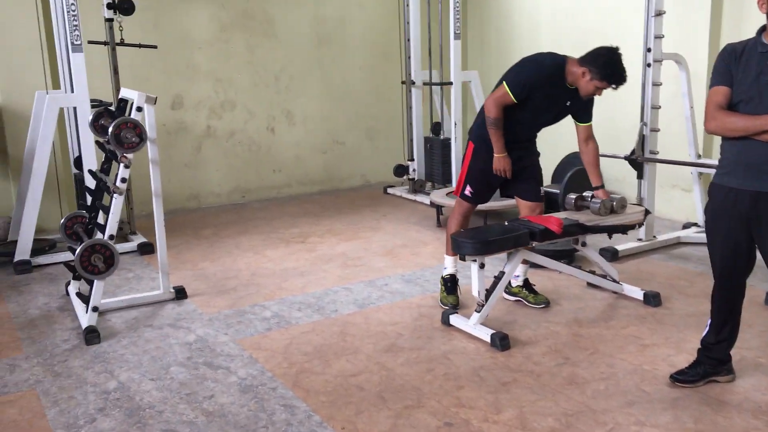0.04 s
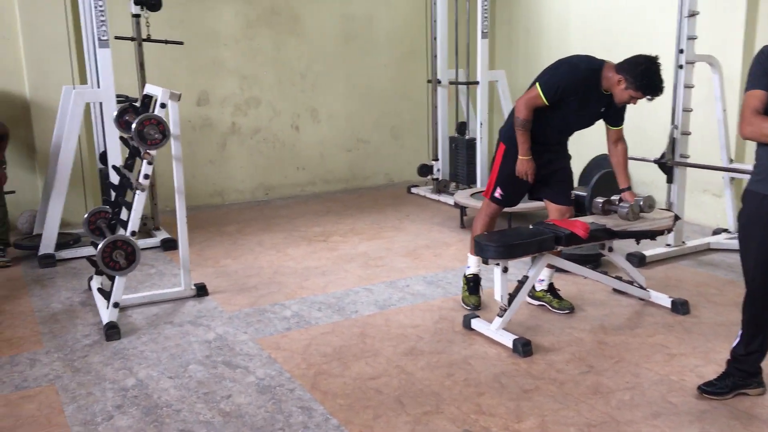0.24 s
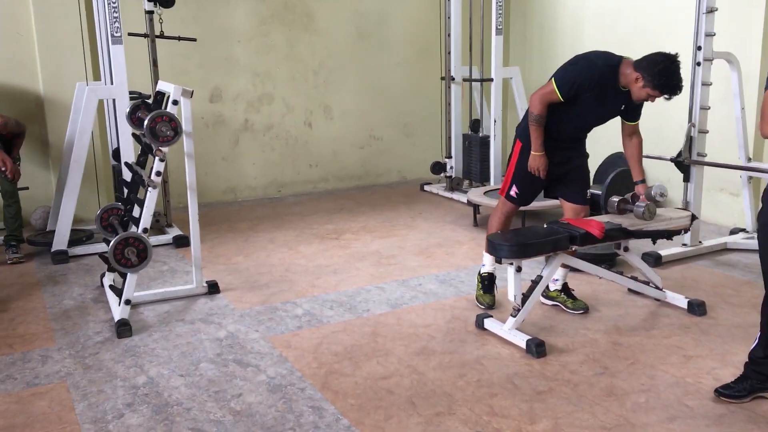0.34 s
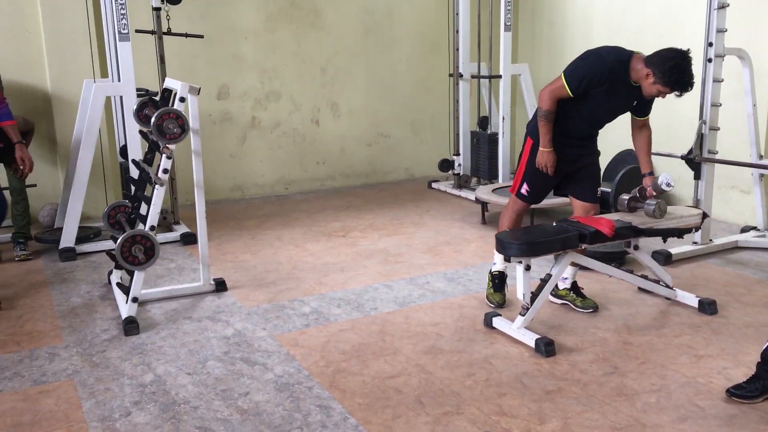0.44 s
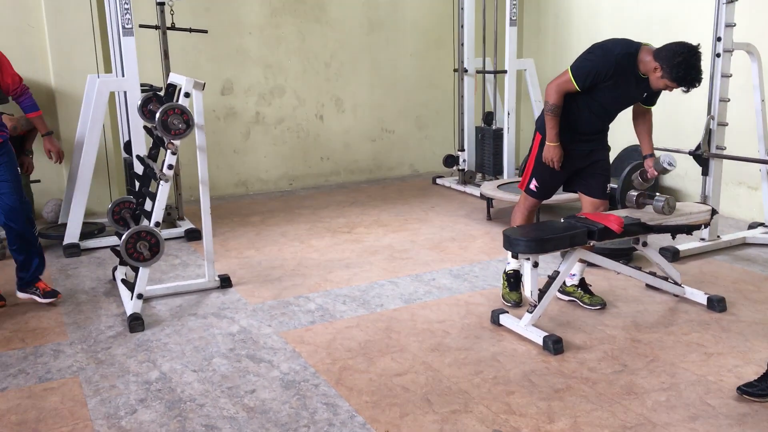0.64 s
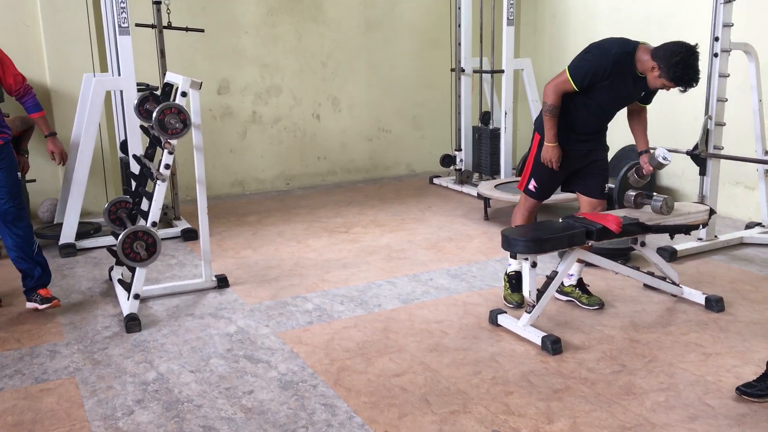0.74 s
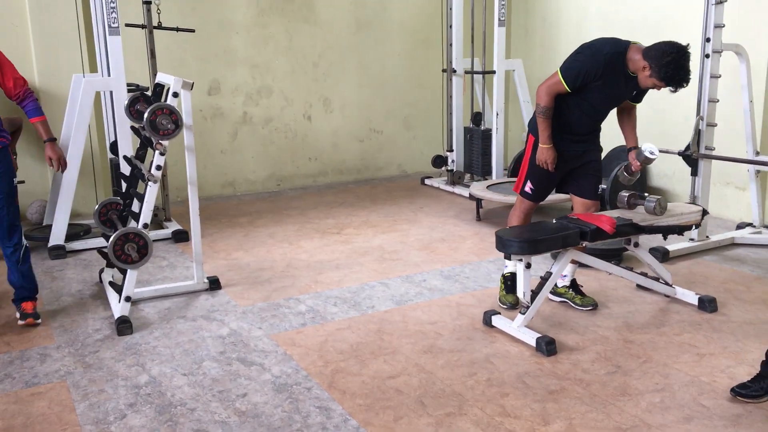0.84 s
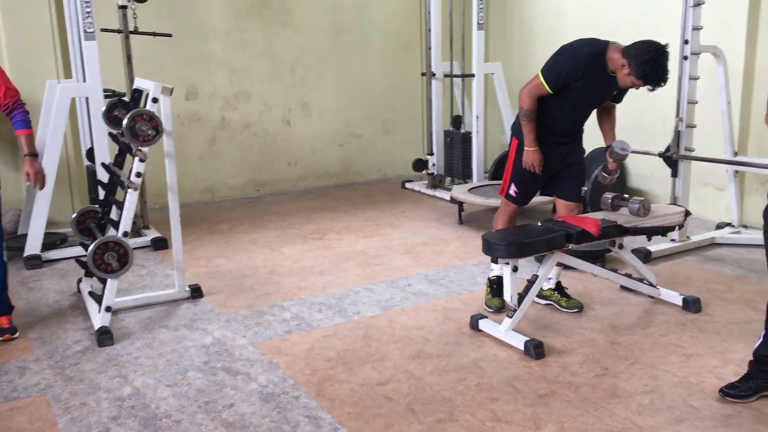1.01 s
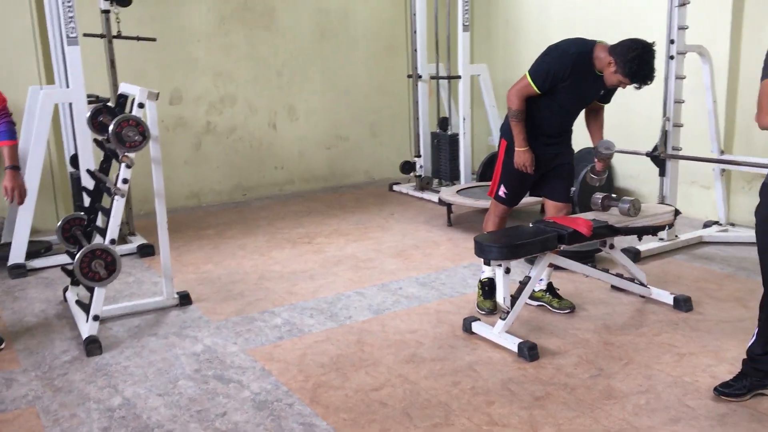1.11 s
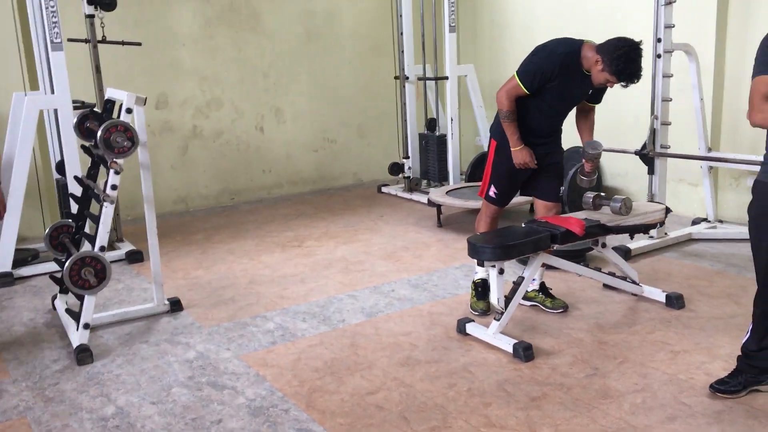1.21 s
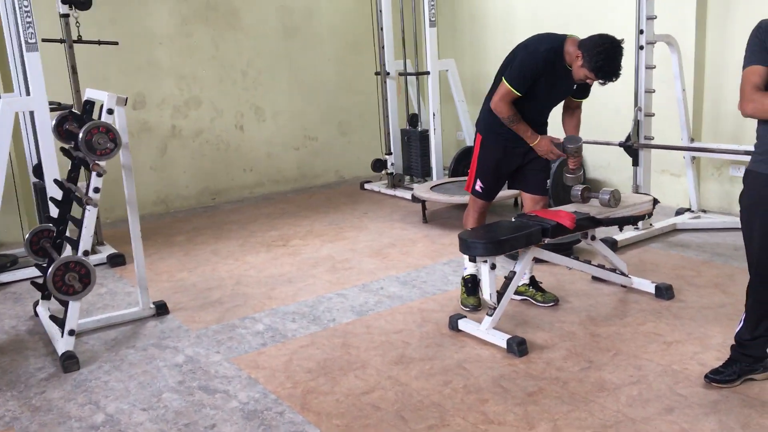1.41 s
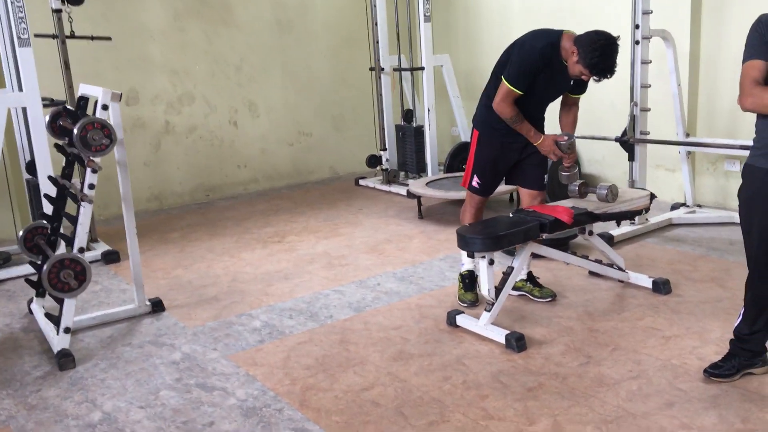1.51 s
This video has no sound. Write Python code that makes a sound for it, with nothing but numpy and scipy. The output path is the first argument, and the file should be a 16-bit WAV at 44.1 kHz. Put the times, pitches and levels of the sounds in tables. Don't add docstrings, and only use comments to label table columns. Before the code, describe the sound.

An iron dumbbell hits a hard gym floor with a sharp crack and deep thud, followed by a long boomy reverberant tail over low building hum; faint shoe scuffs come late. Phone microphone several metres away.

```python
import sys
import numpy as np
from scipy import signal
from scipy.fft import rfft, irfft
from scipy.io import wavfile
from scipy.ndimage import uniform_filter1d

SR = 44100
rng = np.random.default_rng(int(sys.argv[2]) if len(sys.argv) > 2 else 0)


def gain_from_db(level_db):
    decades = np.asarray(level_db, float) / 20
    return 10 ** decades


def to_wav(sig):
    pcm = np.clip(np.atleast_2d(sig), -1, 1) * 32767
    pcm = np.round(pcm).astype(np.int16)
    wavfile.write(sys.argv[1], SR, pcm.T)


N = 68355
BLOW_S, AIR_S = 0.2344, 0.2491


def curve(table, hz):
    table = np.array(table, float)
    return np.interp(np.log(np.maximum(hz, 1)), np.log(table[:, 0]), table[:, 1])


def level(x, db):
    return x * gain_from_db(db) / np.sqrt(np.mean(x ** 2))


def walk(rate_hz):
    hold = max(int(SR / rate_hz), 2)
    steps = rng.standard_normal(N // 20)[np.arange(N) // max(hold, 21)]
    return 1.19 * uniform_filter1d(uniform_filter1d(steps, hold), hold)


def bands(colour):
    hz = np.arange(N // 2 + 1) * SR / N
    noise = rfft(rng.standard_normal(N)) * gain_from_db(curve(colour, hz))
    noise = noise / np.std(irfft(noise, N))
    for mid_hz in 31.25 * 2 ** (np.arange(28) / 3):
        octaves = np.log2(np.maximum(hz, 1) / mid_hz)
        near = np.clip(1 - np.abs(3 * octaves), 0, 1)
        yield mid_hz, irfft(noise * np.sin(np.pi / 2 * near) ** 2, N)


def ring(modes, age, touch_s):
    age = np.maximum(age, 0)
    tones = 0
    for k, (hz, db, t60_s) in enumerate(modes):
        tones = tones + (-1) ** k * gain_from_db(db - 60 * age / t60_s) * np.sin(2 * np.pi * hz * age)
    return -tones * (1 - np.exp(-(age / touch_s) ** 2))


# (frequency [Hz], density [dB])
HUM_COLOUR = [(30, -33), (58, 7.5), (100, -5.5), (400, -15), (1300, -15), (2800, -21), (4800, -33.5),
              (16000, -51)]


def hum():
    swell = walk(2.9)
    noise = sum(band * gain_from_db(3.6 * swell + 0.6 * walk(12.8)) for _, band in bands(HUM_COLOUR))
    return level(noise, -51)


# (frequency [Hz], density [dB])
FADING_COLOUR = [(300, -7.5), (550, -14.5), (900, 3.5), (1300, -9.5), (1600, -33), (2800, -15), (5000, -31),
                 (14000, -31)]


def fading(t):
    start_db, t60_s = -56, 1.6
    noise = sum(band * gain_from_db(4.8 * walk(45)) for _, band in bands(FADING_COLOUR))
    return gain_from_db(start_db - 60 * t / t60_s) * noise


def fitting(t):
    centre_hz, width_hz = 3460, 220
    start_s, rise_s = 1.29, 0.12
    edges = [centre_hz - width_hz / 2, centre_hz + width_hz / 2]
    narrow = signal.butter(2, edges, "band", fs=SR, output="sos")
    tone = signal.sosfilt(narrow, rng.standard_normal(N))
    return level(tone, -67) / (1 + np.exp(-4 * (t - start_s) / rise_s))


# (time [s], rise [s], fall [s], level [dB], brightness [dB per octave])
SCUFFS = [
    (.826, .003, .03, -78, 4),
    (1.03, .02, 0.062, -77, 8),
    (1.152, .012, .02, -69.5, 10),
    (1.214, 0.036, 0.063, -63.5, -2.5),
    (1.31, 0.047, 0.067, -70, -7.5),
    (1.398, 0.0029, .012, -71, 0),
    (1.445, 0.011, 0.056, -71, 5),
]
# (frequency [Hz], density [dB])
SCUFF_COLOUR = [(900, -14), (2000, -3), (4500, 0), (9000, -2), (13000, -5), (16000, -9)]


def scuffs(t):
    out = 0
    for hz, band in bands(SCUFF_COLOUR):
        push = 0
        for time_s, rise_s, fall_s, db, tilt in SCUFFS:
            slope_s = np.where(t < time_s, rise_s, fall_s)
            swell = np.exp(-((t - time_s) / slope_s) ** 2)
            push = push + gain_from_db(db + tilt * np.log2(hz / 8000)) * swell
        out = out + push * band * gain_from_db(1.2 * walk(59.4))
    return out


# (frequency [Hz], density [dB])
TAIL_COLOUR = [(45, -16), (130, -7), (280, -4), (1250, -11.5), (1850, -27), (2800, -26), (5000, -34),
               (16000, -40)]
# (frequency [Hz], t60 [s])
HALL_T60 = [(60, 2.07), (200, 2.99), (700, 2.6), (1500, 1.88), (3000, 1.89), (5000, 1.56), (9500, 1.13),
            (15500, 0.64)]


def hall(t):
    rise_s, bass_rise_cycles = 0.0035, 6
    early_db, early_t60_s = 0.5, 0.13
    age = np.maximum(t - AIR_S, 0)
    out = 0
    for hz, band in bands(TAIL_COLOUR):
        rise = 1 - np.exp(-age / (rise_s + bass_rise_cycles / hz))
        late = gain_from_db(-60 * age / curve(HALL_T60, hz))
        early = gain_from_db(early_db - 60 * age / early_t60_s)
        out = out + band * rise * (late + early) * gain_from_db(walk(25.75))
    return gain_from_db(-19) * out


# (frequency [Hz], level [dB], t60 [s])
BOOM_MODES = [(202.5, -29.5, 1.7), (279.4, -21, 1.05), (350, -31, 2), (432.6, -33.5, 1.2),
              (490.5, -39, 1.5), (638, -33.5, 2), (744, -32, 2), (843, -24, 0.61), (1000, -36.5, 2.2),
              (1132, -38.5, 1.7)]


def boom(t):
    out = 0
    for mode in BOOM_MODES:
        wobble_db = 4 * walk(14.2)
        out = out + gain_from_db(wobble_db) * ring([mode], t - AIR_S, touch_s=0.054)
    return out


# (frequency [Hz], level [dB])
SLAB_COLOUR = [(90, -30), (180, -2), (275, 1), (450, -19), (900, -15), (1250, -30), (2000, -64),
               (5000, -120)]


def slab(t):
    lag = 0.231
    hz = np.arange(N // 2 + 1) * SR / N
    cycles_late = hz * BLOW_S + 2 * lag * np.sqrt(hz)
    wave = irfft(gain_from_db(curve(SLAB_COLOUR, hz)) * np.exp(-2j * np.pi * cycles_late), N)
    wave = wave * np.clip((t - BLOW_S - 0.0045) / 0.003, 0, 1) ** 2
    return wave * gain_from_db(-10.5) / np.max(np.abs(wave))


# (frequency [Hz], level [dB], t60 [s])
IRON_MODES = [(1324, -19.5, 0.036), (2600, -16.5, 0.012), (3170, -15.5, 0.0057), (4030, -21.5, 0.0051),
              (6620, -12, 0.0028), (8680, -9, 0.0027), (10000, -28, 0.0053), (12200, -8.5, 0.0013),
              (15000, -13, .002)]
# (frequency [Hz], level [dB], t60 [s])
THUD_MODES = [(230, -14, .04), (600, -17, .03), (1110, -1, .013)]
# (time after the crack [s], crack level [dB], thud level [dB])
ECHOES = [
    (0, 0, -20),
    (.0016, -12, -26),
    (.0093, -15, 0),
    (.0171, -17, -7),
    (.021, -21, -12),
    (.0255, -21, -13),
    (.029, -21, -12),
]


def clank(t):
    out = 0
    for lag_s, crack_db, thud_db in ECHOES:
        age = t - AIR_S - lag_s
        out = out + gain_from_db(crack_db) * ring(IRON_MODES, age, touch_s=0.00015)
        out = out + gain_from_db(thud_db) * ring(THUD_MODES, age, touch_s=0.0003)
    return out


def scene():
    t = np.arange(N) / SR
    quiet = hum() + fading(t) + fitting(t) + scuffs(t)
    return (quiet + hall(t) + boom(t) + slab(t) + clank(t))[None]


# (frequency [Hz], level [dB])
MIC_RESPONSE = [(20, -30), (45, -3.5), (70, -0.5),
                (3300, -1), (4400, 1.5), (5400, 0), (9600, 4), (10400, -2), (11300, -1), (15600, -4),
           (16000, -26)]


def microphone(sound):
    hz = np.linspace(0, SR / 2, 2049)
    cepstrum = irfft(curve(MIC_RESPONSE, hz) * np.log(10) / 20)
    cepstrum[1:2048] *= 2
    cepstrum[2049:] = 0
    response = irfft(np.exp(rfft(cepstrum)))
    return signal.fftconvolve(sound, response[None])[:, :N]


def top_cut(x):
    return signal.sosfilt(signal.butter(12, 16530, fs=SR, output="sos"), x)


def record(dry):
    hiss = gain_from_db(-79) * rng.standard_normal(N)
    mix = microphone(dry + hiss)
    return top_cut(mix)


dry = scene()
out = record(dry)
to_wav(out)
```